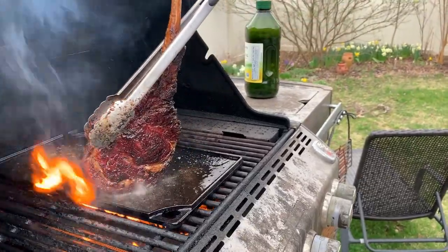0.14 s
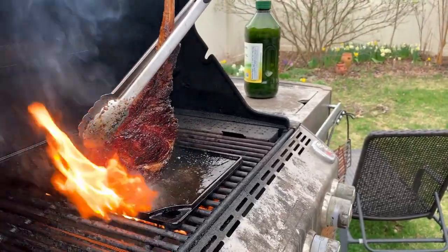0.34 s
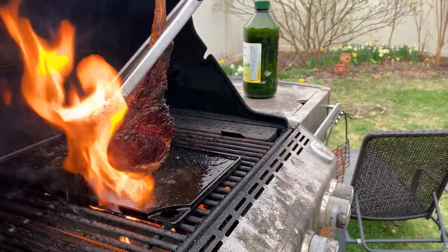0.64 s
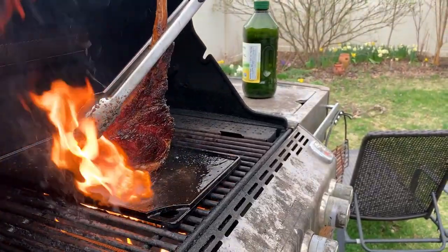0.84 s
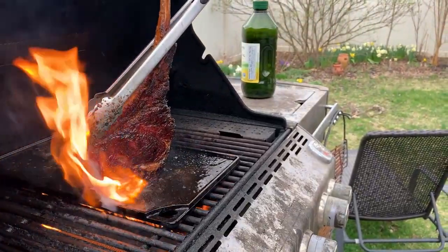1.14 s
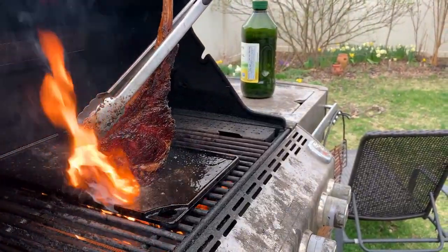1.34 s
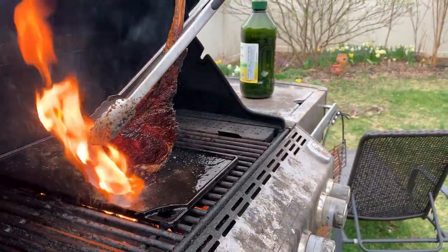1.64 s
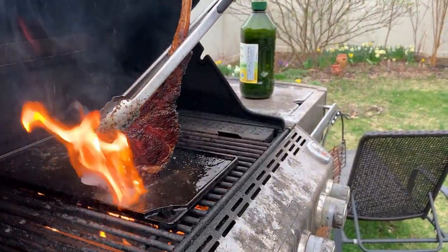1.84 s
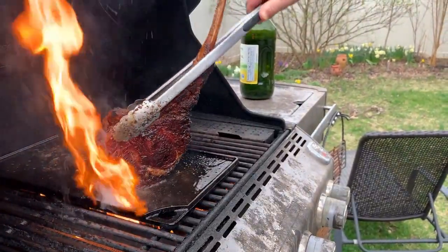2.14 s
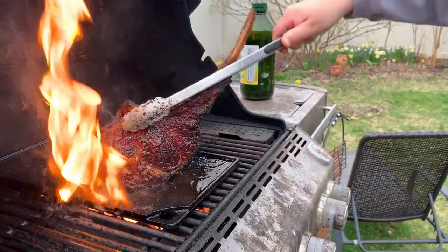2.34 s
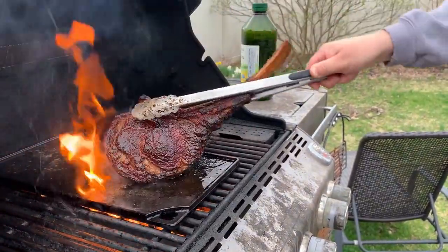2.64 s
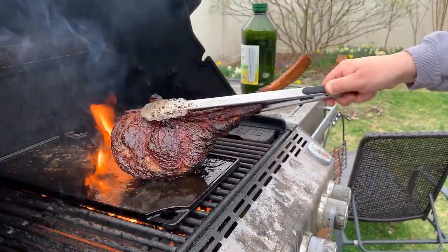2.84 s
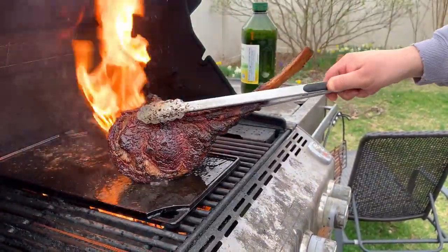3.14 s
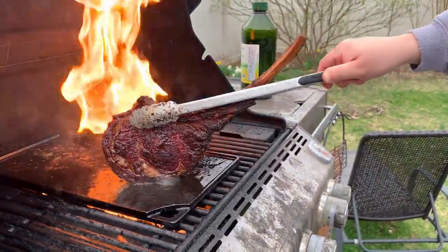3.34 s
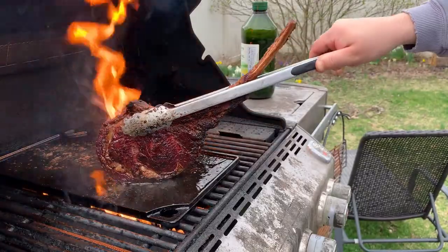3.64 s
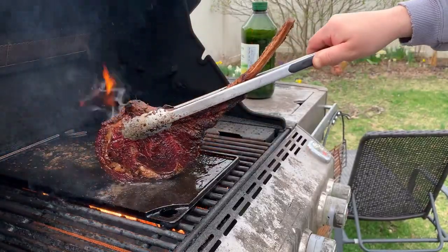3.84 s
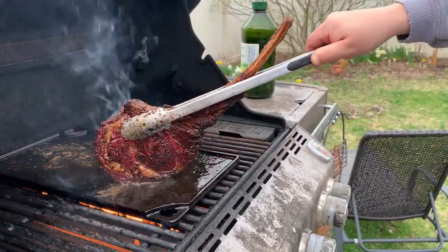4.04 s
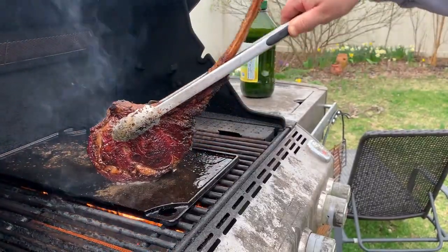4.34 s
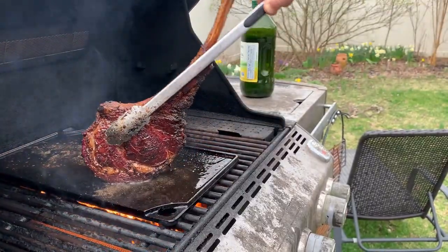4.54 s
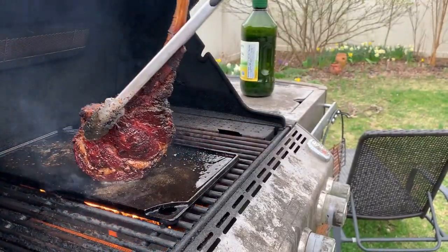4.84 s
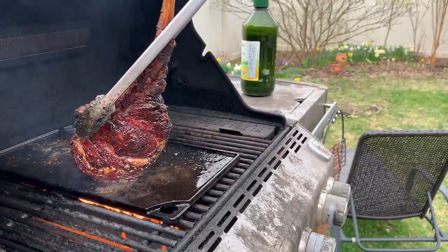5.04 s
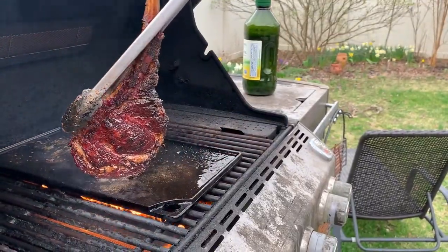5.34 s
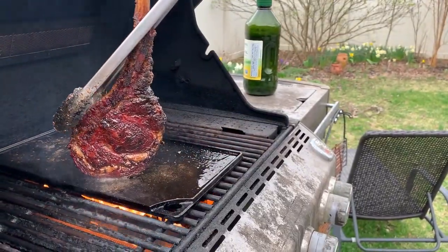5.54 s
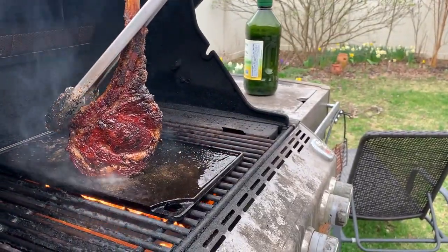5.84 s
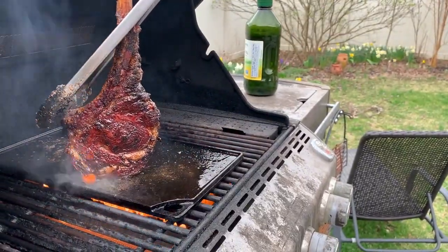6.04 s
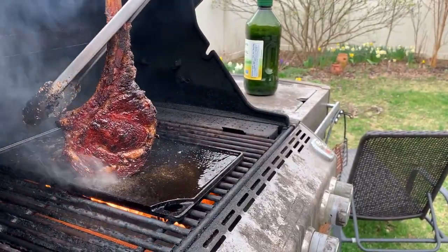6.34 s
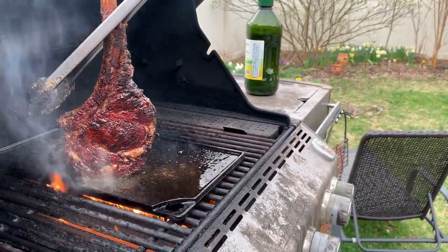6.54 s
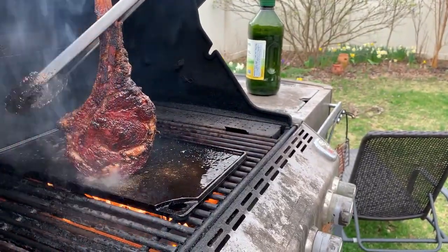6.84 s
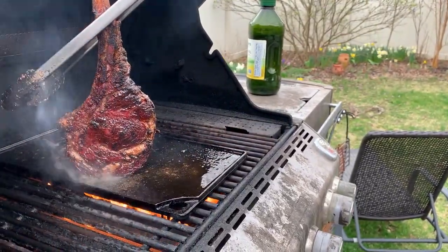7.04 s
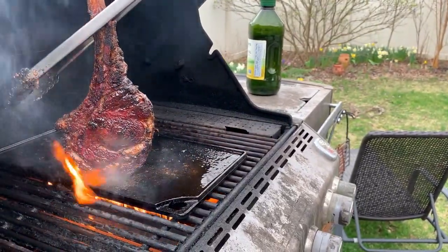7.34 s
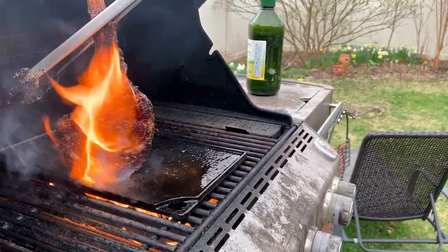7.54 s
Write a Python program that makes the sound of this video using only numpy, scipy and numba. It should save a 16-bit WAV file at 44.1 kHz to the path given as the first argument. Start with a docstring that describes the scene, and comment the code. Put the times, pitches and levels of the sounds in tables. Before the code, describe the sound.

Fatty steak sears on cast iron in an open gas grill, heard about a metre away in a quiet garden by a stereo phone. Bright, dense sizzle runs throughout with sharp spitting cracks. Fluttering flames swell to a hollow roar midway, then collapse; the sizzle thins, soft low burner thumps appear, and the frying surges again. Distant engines hum faintly, with small wind bumps.

```python
"""A steak sears on cast iron in an open gas grill, a metre from a phone with two spaced ports in a garden.
Sizzle, from decaying sines of bursting steam bubbles, runs throughout, with sharp cracks of spitting drops,
sinking engine tones far off and filtered-noise gusts on the ports. Flame noise ringing the steel hood swells
until 3.6 s, while the steak lies flat from 2.9 to 4.3 s. Then the roar sinks and burner flames thump as
low, short sines; the sizzle is weakest near 4.3 s and strongest near 5.8 s."""
import sys
import numpy as np
from scipy import signal
from scipy.fft import rfft, irfft, next_fast_len
from scipy.io import wavfile
from scipy.ndimage import uniform_filter1d
from numba import njit

SR = 44100
rng = np.random.default_rng(int(sys.argv[2]) if len(sys.argv) > 2 else 0)


def master(y):
    """Save y as 16-bit WAV."""
    cut = np.clip(np.atleast_2d(y).T, -1, 1)
    pcm = np.round(cut * 32767)  # scale
    wavfile.write(sys.argv[1], SR, pcm.astype(np.int16))


N = 339129

# heat of the frying, as the relative level of the middle bubbles: (time [s], level [dB])
FRYING = [(0.0, -28), (0.04, -28.5), (0.08, -30), (0.41, -29.5), (0.47, -32), (0.49, -27), (0.51, -30.5),
          (0.62, -33.5), (0.81, -31.5), (0.9, -33), (1.3, -32.5), (1.35, -34), (1.48, -31.5), (1.56, -33.5),
          (1.73, -31), (1.88, -33), (1.97, -30), (2.05, -31.5), (2.7, -33), (2.74, -36), (3.25, -29),
          (3.53, -26.5), (3.7, -30.5), (3.92, -35.5), (3.98, -32.5), (4.0, -35), (4.26, -37), (4.32, -39.5),
          (4.35, -37.5), (4.65, -33.5), (4.67, -34.5), (4.88, -31.5), (4.99, -37), (5.01, -33), (5.31, -36),
          (5.78, -29.5), (5.83, -25.5), (5.85, -30.5), (5.91, -28), (6.0, -32.5), (6.04, -27.5),
          (6.19, -26.5), (6.28, -32), (6.38, -29.5), (6.47, -30.5), (6.51, -26), (6.75, -29.5),
          (6.79, -32.5), (6.87, -28), (6.94, -31), (7.28, -31), (7.41, -33.5), (7.45, -29), (7.56, -28),
          (7.6, -34), (7.69, -34)]


def undb(db):
    """Decibels to gain."""
    return 10 ** (np.asarray(db) / 20)


def unit(x):
    """Scale to rms 1."""
    return x / np.sqrt(np.mean(x ** 2))


def curves(table, s):
    """The columns of a table at times s."""
    t, *columns = np.transpose(table)
    return [np.interp(s, t, c) for c in columns]


def walk(rate):
    """Random levels held 1 / rate s and smoothed twice, without slow drift; spread 1."""
    k = int(SR / rate)
    held = np.repeat(rng.standard_normal(N // k + 1), k)
    level = uniform_filter1d(uniform_filter1d(held, k), k)[:N]
    return unit(level - uniform_filter1d(level, size=4 * k))


def shaped(x, response):
    """Filter x by a function of frequency."""
    size = next_fast_len(N)
    f = np.arange(size // 2 + 1) * SR / size
    return irfft(rfft(x, size) * response(f), size)[:N]


def peak(f, hz, width):
    """Response of one resonance, gain 1 at its centre."""
    return 1j * f * width / (hz ** 2 - f ** 2 + 1j * f * width)


def thinned(x, hz):
    """Second-order high-pass, which takes the bass off a short sound."""
    return shaped(x, lambda f: (1j * f / (hz + 1j * f)) ** 2)


def swells(s, start, length, db, rise, fall):
    """Summed gain of events that rise to their level, hold and fall, at rates in dB per second."""
    total = 0
    for begin, hold, level_db in zip(start, length, db):
        before = np.maximum(begin - s, 0)
        after = np.maximum(s - begin - hold, 0)
        total = total + undb(level_db - rise * before - fall * after)
    return total


@njit
def pops(size, start, hz, cycles, gain, turn):
    """Each pop is a sine that dies to 1 / e within its number of cycles; turn is its starting phase."""
    out = np.zeros(size)
    for k in range(len(start)):
        step = np.exp((2j * np.pi - 1 / cycles) * hz[k] / SR)
        z = gain[k] * np.exp(2j * np.pi * turn[k])
        for i in range(start[k], min(size, start[k] + int(5 * cycles * SR / hz[k]))):
            out[i] += z.real
            z *= step
    return out


def drones(tone_db, rumble_db):
    """Far engines: two sinking bass tones and deep thrums that waver in pitch, over a soft town rumble."""
    # far engine slowing down, before tone_db: (time [s], main tone [dB], upper tone [dB])
    engine = [(0.0, -61, -70), (0.47, -50, -67), (0.66, -47.5, -71), (0.79, -72, -54.5), (1.65, -70, -65),
              (1.8, -49.5, -60), (2.4, -58.5, -53), (3.28, -46, -57), (3.68, -51, -51), (3.75, -56, -48.5),
              (5.15, -41, -60.5), (5.4, -47.5, -49), (5.76, -50, -64), (6.49, -40.5, -48), (6.77, -57, -74),
              (7.05, -46, -60), (7.52, -44.5, -56), (7.69, -56, -68)]
    # pitch of the main and upper tone at the start: [Hz]
    engine_hz = [79, 98.7]
    # wavering of the main and upper tone: [Hz]
    waver_hz = [0.1, 0.69]
    # deep thrums, before tone_db: (time [s], length [s], level [dB], pitch [Hz])
    deep_thrums = [(0, 0.35, -47.5, 46.7), (2.16, 0.21, -50, 46.7), (3.3, .06, -47, 46.7),
                   (4.0, .4, -60, 38), (5.45, 0.14, -53, 54), (6.3, 0.4, -52, 37), (7.0, 0.34, -53, 36.5)]
    sag_per_s = .0165  # share of the starting pitch lost each second
    s = np.arange(N) / SR

    def tone(hz, waver):
        return np.sin(2 * np.pi * np.cumsum(hz + waver * walk(14.0)) / SR)

    tones = sum(undb(db) * tone(hz * (1 - sag_per_s * s), waver)
                for db, hz, waver in zip(curves(engine, s), engine_hz, waver_hz))
    thrum = sum(swells(s, [start], [length], [db], rise=116, fall=35) * tone(hz, 2.0)
                for start, length, db, hz in deep_thrums)
    # separate noise for the part the ports share and the part they hear in opposition
    rumble = [unit(shaped(noise, lambda f: peak(f, 66, 38) * peak(f, 78, 81)))
              for noise in rng.standard_normal((2, N))]
    # the tones lean slightly to the right
    return undb(tone_db) * (tones + thrum) * np.array([[1], [-.3]]) + undb(rumble_db) * np.array(rumble)


def wind():
    """Short gusts thud on each port separately, as noise around a low resonance."""
    # wind buffets on the ports: (time [s], length [s], level [dB])
    gust_table = [(.32, .03, -55), (0.677, .04, -51), (5.4, .05, -63), (5.698, .05, -58), (5.9, .03, -58),
                  (7.64, .05, -53)]
    hz, width_hz, edge_db_per_s = 90, 140, 300
    gusts = swells(np.arange(N) / SR, *np.transpose(gust_table), edge_db_per_s, edge_db_per_s)
    thuds = [unit(shaped(noise, lambda f: peak(f, hz, width_hz) ** 2))
             for noise in rng.standard_normal((2, N))]
    return gusts * np.array(thuds)


def hood(noise, modes):
    """Noise through steep modes of the steel hood; neighbours swing in opposition and join without a gap."""
    def response(f):
        return sum((-1) ** k * undb(db) * peak(f, hz, width) ** 2
                   for k, (hz, width, db) in enumerate(modes))
    return unit(shaped(noise, response))


def flames():
    """Burning fat and gas flutter in two places and flare up; their noise rings the hood around the steak."""
    # flames: (time [s], roar [dB], box mode against the roar [dB], upper modes against the roar [dB])
    fire = [(0, -71, -4, 5), (.3, -52, -10, -6), (.6, -47, -8.5, 0.5), (1.4, -49.5, -10, -1),
            (1.9, -52, -6, 2), (2.4, -47.5, -10, -2.5), (2.8, -46.5, -9.5, -10), (3.1, -46, -15, -3.5),
            (3.35, -42.5, -21.5, -2), (3.55, -37, -18.5, -9), (3.95, -54, -17, -10), (4.6, -60.5, -21, -7),
            (5.5, -62.5, -18, -4.5), (6.2, -55, -9.5, -1), (6.7, -56.5, -12.5, -6), (7.2, -57, -13.5, -4),
            (7.5, -56.5, -10, -0.5), (7.69, -51, -3, 5)]
    # sudden flare-ups: (time [s], length [s], roar [dB])
    flares = [(0.128, 0.022, -46.5), (2.086, 0.0098, -49), (6.811, 0.07, -48), (7.627, .07, -51)]
    # lowest hood modes: (pitch [Hz], width [Hz], level [dB])
    low_modes = [(112, 60, -4), (160.5, 77, 3), (219.8, 86, -5.5)]
    # box mode of the hood: (pitch [Hz], width [Hz], level [dB])
    box_mode = [(327, 49, 0)]
    # upper hood modes with the steak upright: (pitch [Hz], width [Hz], level [dB])
    upright_modes = [(554, 126, -2), (892, 200, -1.5), (1203, 120, -1.5)]
    # upper hood modes with the steak lying: (pitch [Hz], width [Hz], level [dB])
    flat_modes = [(560, 110, -1), (976, 300, -3), (1324, 200, -1)]
    puff_box_db, puff_upper_db = -11, -9  # against the roar of the flare-up
    lies_s, lifts_s, turn_s = 2.86, 4.3, .071  # the steak lies flat between; time to turn

    s = np.arange(N) / SR
    roar_db, box_db, upper_db = curves(fire, s)
    puffs = swells(s, *np.transpose(flares), rise=306, fall=211)
    low = undb(roar_db) + puffs
    box = undb(roar_db + box_db) + undb(puff_box_db) * puffs
    upper = undb(roar_db + upper_db) + undb(puff_upper_db) * puffs
    lying = np.clip(np.minimum(s - lies_s, lifts_s - s) / turn_s, 0, 1)
    flutter_db = .9 * walk(18) + 1.5 * walk(45)

    def roar(noise):
        upright_ring = (1 - lying) * hood(noise, upright_modes)
        lying_ring = lying * hood(noise, flat_modes)
        return low * hood(noise, low_modes) - box * hood(noise, box_mode) + upper * (upright_ring + lying_ring)

    return np.array([roar(noise) for noise in rng.standard_normal((2, N)) * undb(flutter_db)])


def thumps(loss_db):
    """Pockets of gas light up with a soft low knock; loss_db makes up for decay before the crest."""
    # dull thumps of the burner flames: (time [s], peak [dB], pitch [Hz])
    knocks = [(4.061, -45, 202), (4.341, -47, 223), (4.436, -42, 165), (4.528, -48, 199), (4.595, -42, 153),
              (4.822, -47, 175), (4.972, -41, 170), (5.174, -43, 149), (5.233, -48, 143), (5.334, -41, 157),
              (5.713, -47, 180), (5.798, -42.5, 179), (5.954, -46, 151), (6.168, -50, 162),
              (6.275, -45, 143), (7.04, -50, 144), (7.392, -45, 199)]
    s, db, hz = np.transpose(knocks)
    return pops(N, (s * SR).astype(np.int64), hz, 1.14, undb(db + loss_db), np.full(s.size, 3 / 4))


def colour(f):
    """Gain of the sizzle against frequency."""
    # colour of the sizzle: (frequency [Hz], relative density [dB per Hz])
    sizzle = [(300, -36), (700, -28), (950, -19), (1500, -13), (2000, -19.5), (3000, -12), (4500, -10.5),
              (5500, -11), (6500, -3), (8000, -1), (10000, 0), (12000, -5.5), (14000, -6), (16000, -11)]
    hz, db = np.transpose(sizzle)
    return undb(np.interp(np.log(f + 1), np.log(hz), db))


def crackle(count, cycles, spread_db, most_db):
    """Between the bubbles, fat snaps in needle-thin clicks that partly follow the heat of the pan."""
    heat_follow = .6  # dB for each dB of the frying
    when, pitch, luck, turn = rng.random((count, 4)).T
    start = (when * N).astype(np.int64)
    heat_db = curves(FRYING, start / SR)[0]
    db = np.mean(heat_db) + heat_follow * (heat_db - np.mean(heat_db))
    db += np.minimum(-spread_db * np.log(1 - luck), most_db)
    clicks = pops(N, start, 4000 + 9000 * pitch, cycles, undb(db), turn)
    return shaped(clicks, lambda f: np.sqrt(colour(f)))


def blips(count, cycles, spread_db, most_db):
    """Larger bubbles in the pooled fat ring briefly at their own pitch, here and there over the plate."""
    when, pitch, luck, turn = rng.random((count, 4)).T
    start = (when * N).astype(np.int64)
    hz = 1500 * 4 ** pitch
    db = curves(FRYING, start / SR)[0] + np.minimum(-spread_db * np.log(1 - luck), most_db)
    gain = undb(db) * colour(hz)
    return np.array([pops(N, start[k::2], hz[k::2], cycles, gain[k::2], turn[k::2]) for k in range(2)])


def spits(cycles, loss_db, thin_hz, body_thin_hz, body_cycles, count):
    """A water drop explodes in the fat: a sharp, thin crack with a duller body, then droplets patter."""
    # spitting drops: (time [s], peak [dB], body against the peak [dB])
    drop_table = [(0.0263, -8, -22), (0.0454, -15, -26), (0.1394, -16, -24), (0.3506, -13, -23),
                  (0.4134, -15, -19), (0.4903, -15, -19), (0.7384, -16, -19), (1.1598, -17, -23),
                  (2.3924, -17, -27), (2.5237, -12, -30), (2.5279, -16, -30), (2.5456, -17, -22),
                  (2.7854, -21, -7), (2.8674, -18, -19), (3.1427, -15, -14), (3.1807, -11, -19),
                  (3.5064, -13, -20), (3.7853, -16, -27), (3.8354, -21, -24), (3.921, -22, -26),
                  (4.0173, -21, -30), (4.0542, -19, -30), (4.1174, -19, -27), (4.2009, -19, -25),
                  (4.2233, -15, -20), (4.2403, -11, -35), (4.2488, -15, -13), (4.2858, -22, -12),
                  (4.4797, -19, -18), (4.5675, -17, -23), (4.6344, -19, -19), (4.781, -18, -22),
                  (4.805, -19, -21), (4.8633, -17, -23), (5.2375, -20, -25), (5.3797, -19, -30),
                  (5.4001, -17, -23), (5.5263, -18, -24), (5.7204, -12, -27), (5.7384, -14, -30),
                  (6.0484, -13, -28), (6.135, -16, -19), (6.1559, -10, -27), (6.192, -14, -27),
                  (6.771, -19, -10)]
    crack_hz, scatter, lag_s = 9600, .15, .0012  # pitch, its spread from drop to drop, delay of the whole spit after its listed time
    patter_s, patter_db = .0018, -5  # spread and level of the droplets
    snap_cycles, snap_db = .6, 2  # the broad snap that opens each spit
    s, db, body_db = np.transpose(drop_table)
    late, bend = rng.random((len(s), count)), rng.standard_normal((len(s), count))
    touch = ((s + lag_s) * SR).astype(np.int64)
    touch_turn = np.full(s.size, 3 / 4)
    # low and high ring of the body: (pitch [Hz], level [dB])
    body = sum(pops(N, touch, np.full(s.size, hz), body_cycles, undb(db + body_db + ring_db), touch_turn)
               for hz, ring_db in [(1250., -4), (4000., 2)])

    # the first of each group is the crack, the others are its droplets
    follows = np.arange(count) > 0
    hz = crack_hz * (1 + scatter * np.clip(bend, -2, 3))
    each_s = s[:, None] + lag_s - follows * patter_s * np.log(1 - late)
    each_db = db[:, None] + follows * patter_db
    start = (each_s.ravel() * SR).astype(np.int64)
    # loss_db makes up for the decay before the first crest
    crack = pops(N, start, hz.ravel(), cycles, undb(each_db.ravel() + loss_db), np.full(start.size, 3 / 4))
    snap = pops(N, touch, hz[:, 0].copy(), snap_cycles, undb(db + loss_db + snap_db), touch_turn)
    return thinned(crack + snap, thin_hz) + thinned(body, body_thin_hz)


def bubbles(count, cycles, spread_db, most_db, patchy_db):
    """Steam bubbles of every size burst at random over two patches of the plate, as the fat flares and rests."""
    # pitches of big, middle and finest bubbles: [Hz]
    size_hz = [4860, 7400, 12900]
    # slow drift in which bubbles lead: (time [s], big bubbles [dB], finest bubbles [dB])
    lead_table = [(0, -2, 2.5), (.6, 2, 1.5), (1.2, 5, 3.5), (2.5, -0.5, 1.5), (3, 4, 4.5), (3.5, 1, 0.5),
                  (3.9, -6, 0.5), (4.3, 2.5, 1), (4.7, -4, -2), (5.3, 0.5, 1), (5.8, -3.5, 2),
                  (6.3, -1.5, 1.5), (6.8, -1, 2.5), (7.3, 0, 4), (7.69, -4, 4.5)]
    big_follow, fine_follow = .99, 1  # dB for each dB of the middle bubbles
    sputter_db_per_db = .065  # the quieter the pan, the more it sputters

    when, pitch, luck, turn = rng.random((count, 4)).T
    start = (when * N).astype(np.int64)
    hz = 300 + 17500 * pitch
    middle_db = curves(FRYING, start / SR)[0]
    place = np.interp(hz, size_hz, [-1, 0, 1])  # big, middle, finest
    follow = 1 + np.abs(place) * (np.where(place < 0, big_follow, fine_follow) - 1)
    db = np.mean(middle_db) + follow * (middle_db - np.mean(middle_db))
    db += np.abs(place) * np.where(place < 0, *curves(lead_table, start / SR))

    # all bubbles surge together; bubbles of like size also flicker as a group
    groups = np.array([walk(20) for _ in range(9)])
    surge = 4 * walk(9) + 3 * walk(40)
    db += patchy_db * surge[start]
    db += 1.2 * groups[(pitch * len(groups)).astype(int), start]
    db += sputter_db_per_db * (np.max(middle_db) - middle_db) * walk(130)[start]

    # some bubbles are louder than the rest
    loudness = undb(np.minimum(-spread_db * np.log(1 - luck), most_db))
    # the root of the pitch evens out the energy of short and long bursts
    gain = unit(loudness) * np.sqrt(hz / SR) * undb(db)
    patches = [pops(N, start[k::2], hz[k::2], cycles, gain[k::2], turn[k::2]) for k in range(2)]
    return np.array([shaped(patch, colour) for patch in patches])


def ports(near, aside):
    """The ports get one sound alike and the other in opposition; the pair shifts them in phase and level."""
    # the two ports: (frequency [Hz], right leads [rad], likeness [0-1], left minus right [dB])
    port_table = [(0, 0, .9, -.5), (150, 0, .97, -1.4), (300, .15, .82, -1.8), (600, -.7, .9, .3),
                  (1000, -1.7, .75, 6), (1300, -1.3, .9, -.3), (1490, -3.1, .97, -.5),
                  (1600, -3.4, .9, -1.2), (2000, -4.2, .6, 3.5), (2400, -3.2, .85, .1),
                  (3300, -4.5, .2, 1.2), (4400, -6.5, .6, .3), (5200, -6.3, .2, -2.2),
                  (5900, -4.55, .6, -2.6), (7000, -3.06, .7, .3), (9000, -.35, .92, 0),
                  (11600, 3.16, .995, 0), (16000, 9.16, .78, 0)]
    hz, lead, likeness, pan_db = np.transpose(port_table)

    def share(f):
        return (1 + np.clip(np.interp(f, hz, likeness), 0, 1)) / 2

    def shift(f, side):
        level = undb(np.interp(f, hz, pan_db) / 2)
        return (level * np.exp(-.5j * np.interp(f, hz, lead))) ** side

    def port(side):
        alike = shaped(near, lambda f: shift(f, side) * np.sqrt(share(f)))
        opposed = shaped(aside, lambda f: shift(f, side) * np.sqrt(1 - share(f)))
        return alike + side * opposed

    return np.array([port(side) for side in (1, -1)])  # left, right


def scene():
    """Drones, flames and frying as the two ports hear them, with wind on the ports."""
    background = drones(tone_db=3.5, rumble_db=-52.5)
    fire = flames()
    rings = undb(2.5) * blips(count=2500, cycles=11.4, spread_db=2.0, most_db=10)
    fat = undb(17) * bubbles(count=200000, cycles=1.75, spread_db=1.6, most_db=6, patchy_db=.16)
    near, aside = fat + rings + fire + background
    needles = undb(13.0) * crackle(count=2000, cycles=.7, spread_db=2.2, most_db=7)
    drops = spits(cycles=2.5, loss_db=2.5, thin_hz=3500, body_thin_hz=700, body_cycles=2.2, count=6)
    return ports(near + needles + drops + thumps(loss_db=3.0), aside) + wind()


def record(dry):
    """The phone drops the deepest bass and cuts the top steeply at 15.8 kHz."""
    dry = signal.sosfilt(signal.butter(2, 35, "high", fs=SR, output="sos"), dry)
    return signal.sosfilt(signal.ellip(12, .2, 80, 15800, fs=SR, output="sos"), dry)


dry = scene()
out = record(dry)
master(out)
```